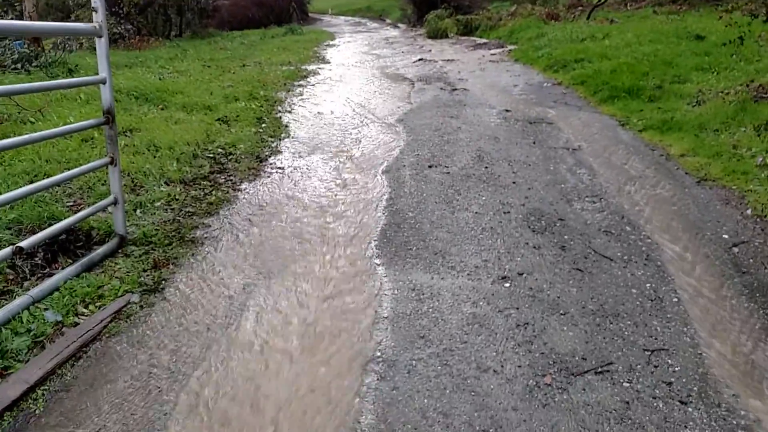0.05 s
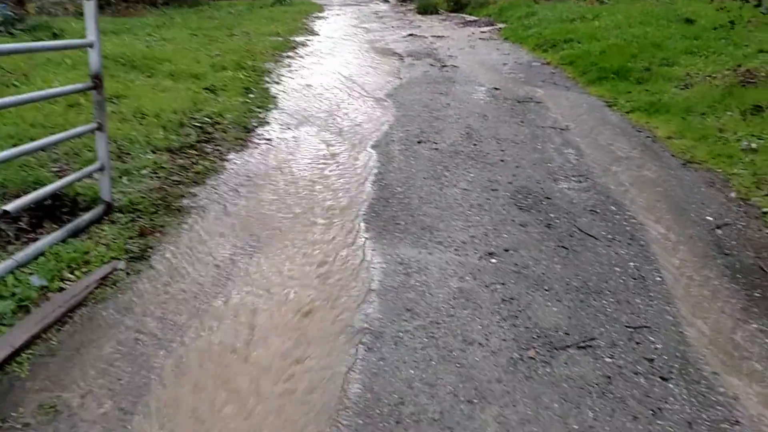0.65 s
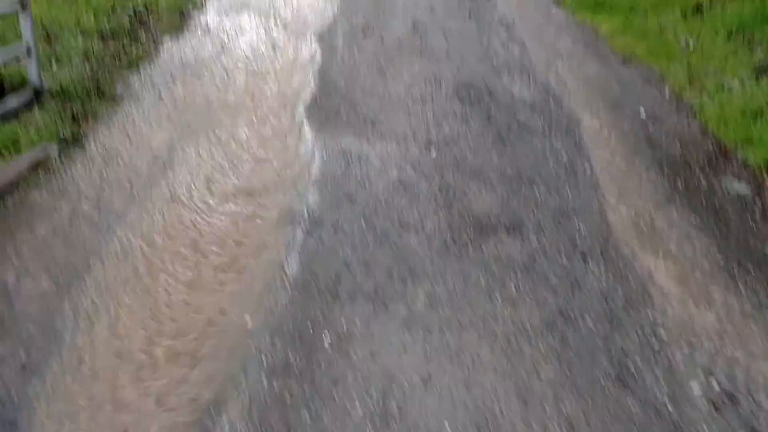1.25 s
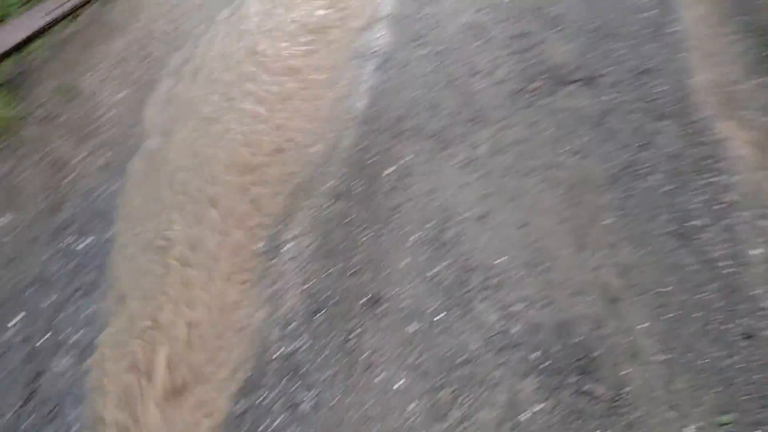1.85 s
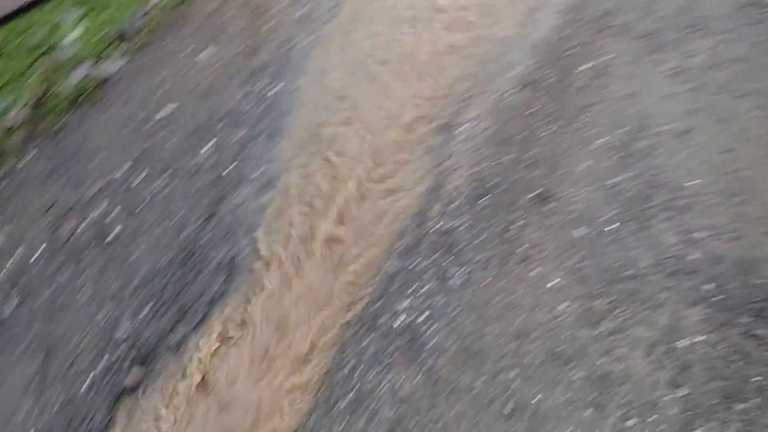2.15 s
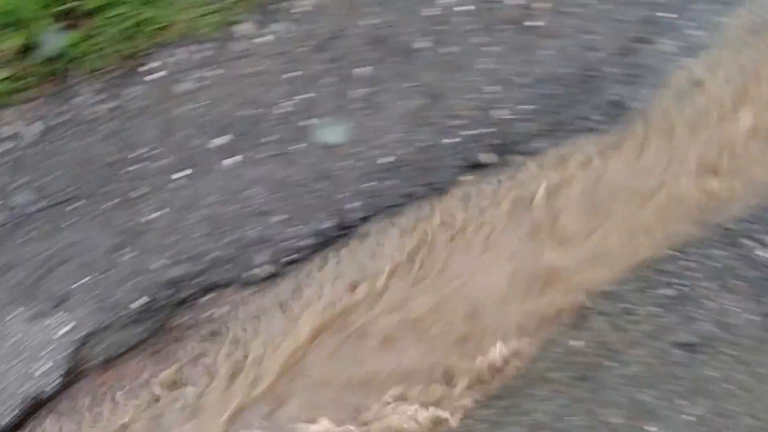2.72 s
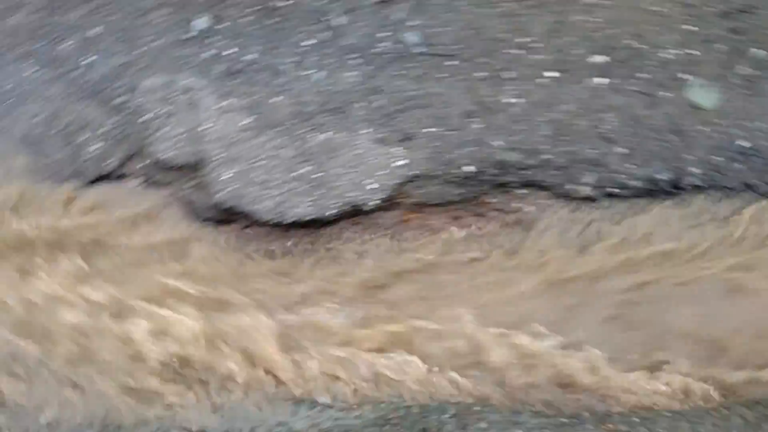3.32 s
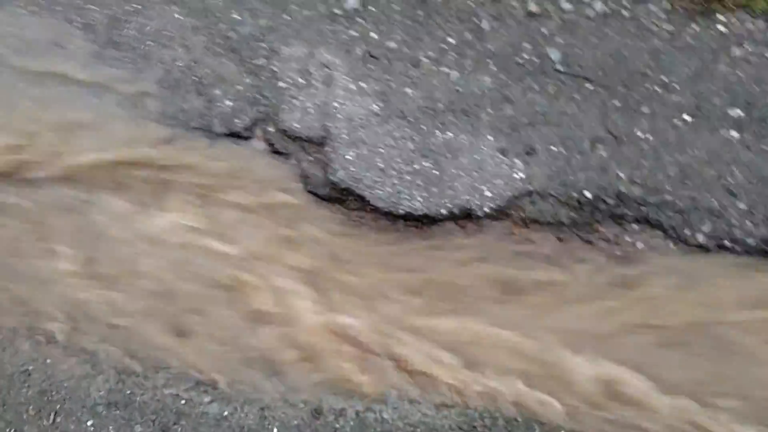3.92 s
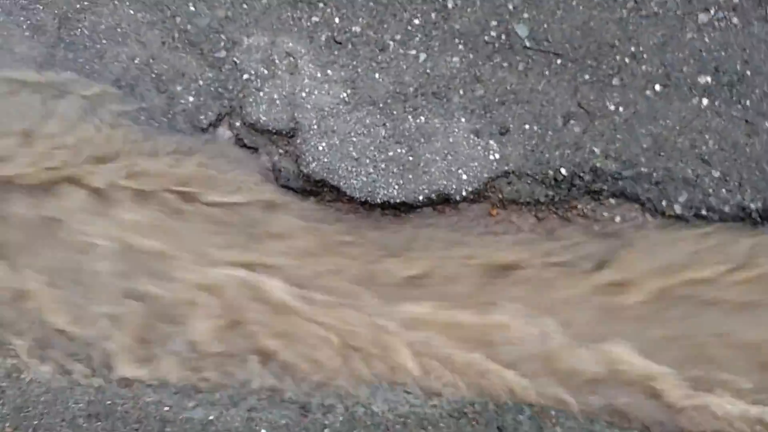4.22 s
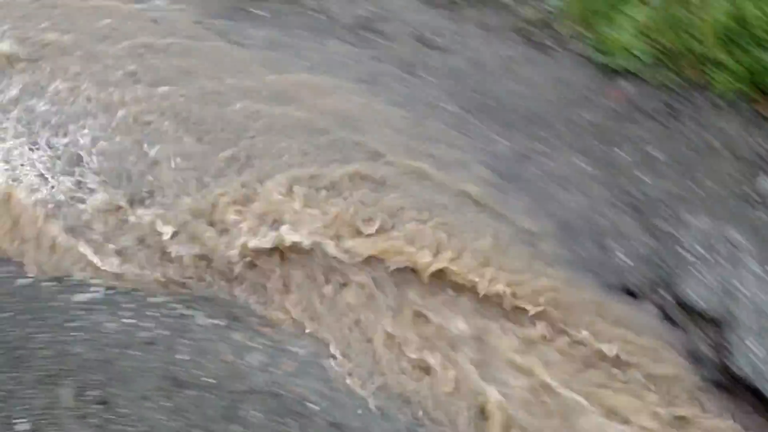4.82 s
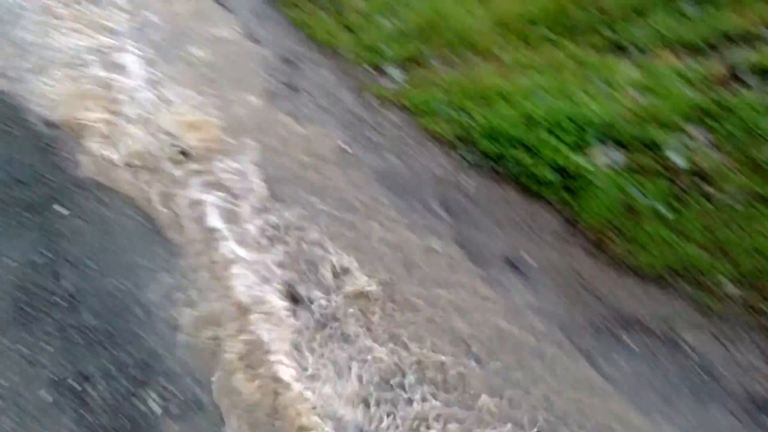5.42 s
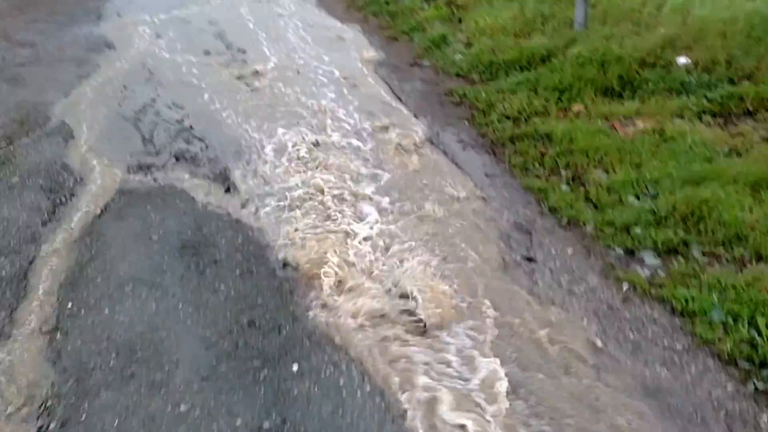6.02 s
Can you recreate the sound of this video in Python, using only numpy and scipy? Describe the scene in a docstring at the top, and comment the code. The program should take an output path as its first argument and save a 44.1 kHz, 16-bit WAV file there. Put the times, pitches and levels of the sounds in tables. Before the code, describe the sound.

Outdoors, muddy runoff rushes down a paved driveway in a churning wash of short bubbles and ticking spray. Light wind flutters on the hand-held microphone at first, then dies away. The microphone takes one dull knock as it moves closer, and the water grows louder and fuller. Near the end, hard wind buffets rumble in and briefly push the water down in level.

```python
"""A churning wash of short bubbles and ticking spray: muddy runoff rushing down a paved driveway.
It grows louder and fuller as a hand-held camera walks up to it; the camera takes one dull knock.
Wind eddies flutter on the microphone at first, die away, and return near the end as hard buffets
that make the gain control duck the water."""
import sys
import numpy as np
from scipy import signal
from scipy.fft import rfft, irfft
from scipy.io import wavfile
from scipy.ndimage import uniform_filter1d

SR = 44100
rng = np.random.default_rng(int(sys.argv[2]) if len(sys.argv) > 2 else 0)


def dump(signal):
    """Clip the signal to [-1, 1] and save it as 16-bit WAV at the path in sys.argv[1]."""
    limited = np.clip(np.atleast_2d(signal).T, -1, 1)
    pcm = np.round(limited * 32767).astype(np.int16)
    wavfile.write(sys.argv[1], SR, pcm)


N = 271782
TIME_S = np.arange(N) / SR

# Wind on the microphone. Each row: start in seconds, length in seconds, relative level in dB.
WIND_GUSTS = [(0, 0.95, -47), (0.153, .11, -31), (0.311, 0.028, -36), (0.406, 0.038, -32.5),
              (0.546, 0.13, -27.5), (0.675, 0.14, -34), (0.89, 0.056, -34), (1.37, 0.22, -38.5),
              (1.712, 0.24, -38), (2, 0.089, -37.5), (4.811, 0.028, -22.5), (4.907, 0.17, -20.5),
              (5.039, 0.28, -16.5), (5.36, 0.024, -14), (5.442, 0.093, -17), (5.558, 0.17, -10),
              (5.753, 0.29, -23.5), (5.864, 0.11, -8.5), (5.993, 0.21, -19.5)]
# Strongest eddies. Each row: centre in seconds, relative level in dB, frequency in Hz.
HARD_EDDIES = [(0.19, -23, 116), (0.244, -24, 139), (0.57, -15.5, 83), (0.614, -15.5, 161),
               (0.646, -17, 106), (1.393, -21, 108), (2.115, -22, 117), (4.823, -10, 158),
               (5.047, 7.5, 176), (5.069, -7, 210), (5.197, -0.5, 133), (5.246, -1, 148), (5.467, 4, 137),
               (5.582, -0.5, 197), (5.631, 7.5, 185), (5.705, 3, 154), (5.721, 2.5, 202), (5.745, 6, 132),
               (5.913, 9, 293), (5.981, 1, 190), (6.123, 4, 159)]
# Largest bubbles. Each row: time in seconds, peak in dB, pitch in Hz, decay in cycles.
BIG_BUBBLES = [(0.255, -27, 1800, 4.4), (0.483, -24, 1850, 2.2), (1.148, -19.5, 1940, 4.9),
               (1.561, -27.5, 970, 5.3), (1.829, -25, 1160, 7.8), (2.479, -17.5, 1190, 1.9),
               (2.899, -21.5, 1056, 7.3), (3.222, -24, 724, 8), (3.396, -21, 1230, 5.1),
               (3.447, -22.5, 990, 3), (3.462, -14, 704, 0.78), (3.569, -20, 1340, 4),
               (3.812, -24, 985, 6.5), (4.022, -19.5, 980, 6), (4.32, -25.5, 838, 10.6),
               (4.435, -25.5, 770, 8), (4.562, -24.5, 514, 7.9), (4.651, -20, 720, 3.7),
               (4.964, -22.5, 870, 7)]
# Brightest splashes. Each row: start in seconds, relative ring level in dB, pitch in Hz, tick in dB.
BRIGHT_SPLASHES = [(0.137, -32, 4430, -55), (0.493, -48, 5000, -45), (1.189, -36, 6120, -52),
                   (1.629, -31.5, 5420, -46), (2.033, -29, 4070, -56), (2.356, -33, 6000, -43),
                   (2.399, -29, 5600, -45), (2.643, -26, 5200, -41), (2.992, -27, 6240, -33),
                   (3.093, -31, 5690, -41), (3.81, -22.5, 3600, -52)]
# Spectra of the shallow sheet and deep channel. Each row: frequency in Hz, relative density in dB.
SHALLOW_SPECTRUM = [(40, 12.5), (150, 6), (450, -1), (850, 2.5), (1400, 1.5), (2000, -1.5), (2900, -13.5),
                    (4500, -21.5), (6500, -28), (8700, -30.5), (10500, -38.5), (13000, -39.5), (15500, -46)]
DEEP_SPECTRUM = [(40, -10), (170, -11), (400, -2.5), (750, 2), (1150, 2.5), (1800, -1), (2550, -9.5),
                 (3800, -18), (5800, -25), (7600, -33), (10500, -43), (13000, -42), (15500, -46)]
# Treble notch, sliding as the camera turns. Each row: time in seconds, centre in Hz, depth in dB.
TREBLE_NOTCH = [(0, 10400, -1), (1.1, 10200, 2), (1.6, 9100, 5), (2.3, 8500, 7), (2.8, 7700, 0),
                (3.6, 7300, 5), (5, 7750, 3.5), (6.1, 10400, 1)]
# Breaking wavelets. Each row: centre in seconds, half length in seconds, extra spray in dB.
WAVELETS = [(0.125, 0.039, 2.5), (1.99, .05, 2), (2.417, 0.03, 3), (2.967, 0.08, 1.5), (3.777, 0.35, 2.5),
            (4.353, 0.25, 2), (5.5, 0.12, 0.5)]
# Water under the camera. Each row: time in seconds, nearness 0-1 (level), depth 0-1 (colour).
WALK = [(0, 0.1, 0.15), (1.0, 0, 0), (1.7, 0.12, 0.3), (2.28, 0.28, 0.3), (2.5, 0.57, 0.64),
        (2.85, 0.58, 0.6), (3.3, 0.9, 0.93), (4.2, 0.8, 0.74), (4.6, 0.96, 0.87), (4.95, 1, 0.65),
        (5.35, 0.88, 0.56), (5.6, 0.91, 0.4), (6.15, 0.68, 0.5)]


def gain_of(db):
    """Decibels to amplitude."""
    return 10 ** (np.asarray(db) / 20)


def unit_rms(x):
    """Scale to an rms of one."""
    return x / np.sqrt(np.mean(x ** 2) + 1e-20)


def spectrum_db(points, hz):
    """Interpolate a spectrum over log frequency."""
    point_hz, db = np.transpose(points)
    return np.interp(np.log(hz + 1), np.log(point_hz), db)


def follow(rows, t):
    """Interpolate each column of a curve at times t."""
    times_s, *columns = np.transpose(rows)
    return [np.interp(t, times_s, column) for column in columns]


def add(mix, start_s, sound):
    """Mix a sound in at start_s."""
    part = mix[max(round(start_s * SR), 0):][:len(sound)]
    part += sound[:len(part)]


def band(x, lo_hz, hi_hz, order=2):
    """Zero-phase band-pass at unit rms."""
    sos = signal.butter(order, [lo_hz, hi_hz], "band", fs=SR, output="sos")
    return unit_rms(signal.sosfiltfilt(sos, x, padtype=None))


def patches(shape, frames, bins):
    """Random field, smooth over time and frequency."""
    field = rng.standard_normal(shape)
    for axis, size in enumerate((frames, bins)):
        field = signal.fftconvolve(field, np.expand_dims(np.hanning(size), 1 - axis), "same")
    return unit_rms(field)


def knock(start_s=2.3293, from_hz=750, to_hz=170, glide_s=0.0012, attack_s=0.0008, decay_s=0.0019):
    """Dull bump on the camera; its pitch drops at once."""
    out, t = np.zeros(N), np.arange(SR // 20) / SR
    hz = to_hz + (from_hz - to_hz) * np.exp(-t / glide_s)
    envelope = (1 - np.exp(-t / attack_s)) * np.exp(-t / decay_s)
    add(out, start_s, gain_of(-4) * envelope * np.sin(2 * np.pi * np.cumsum(hz) / SR))
    return out


def gust(start_s, length_s, db, attack_s=0.023, release_s=0.011):
    """Strength of one gust: rise, hold, release."""
    age_s = np.maximum(TIME_S - start_s, 0)
    release = np.exp(-np.maximum(age_s - length_s, 0) / release_s)
    return gain_of(db) * np.minimum(age_s / attack_s, 1) * release


def wind(soft_hz=(15, 150), hard_hz=(50, 275), order=3.96, lumps_db=3, calm_db=-27, full_db=-12):
    """Lumpy turbulence on the microphone; stronger wind has quicker eddies."""
    strength = sum(gust(*row) for row in WIND_GUSTS)
    hz, noise = np.fft.rfftfreq(N, 1 / SR), rfft(rng.standard_normal(N))
    soft, hard = (unit_rms(irfft(noise * hz / (hz + low) / np.sqrt(1 + (hz / top) ** (2 * order)), N))
                  for low, top in (soft_hz, hard_hz))
    force = np.clip((20 * np.log10(strength + 1e-9) - calm_db) / (full_db - calm_db), 0, 1)
    lumps = gain_of(lumps_db * band(rng.standard_normal(N), 24.6, 38.7))
    flow = ((1 - force) * soft + force * hard) * lumps
    flow /= np.sqrt(uniform_filter1d(flow ** 2, size=2600) + 1e-6)  # gusts alone set the slow level
    return gain_of(0.5) * strength * flow


def eddy(hz, width_cycles=0.31):
    """One swirl passing the microphone: a pressure push and pull, centred in 0.1 s."""
    cycles = hz * (np.arange(SR // 10) - SR // 20) / SR
    return np.cos(2 * np.pi * cycles + rng.uniform(0, 2 * np.pi)) / np.cosh(cycles / width_cycles)


def buffets(bite_ratio=2.38):
    """Hard eddies shed a quicker swirl; it gives the strong ones their bite."""
    out = np.zeros(N)
    for centre_s, db, hz in HARD_EDDIES:
        swirl = eddy(hz)
        bite = gain_of(db / 2 - 15) * eddy(hz * bite_ratio)
        add(out, centre_s - 0.05, gain_of(db - 0.5) * (swirl + bite))
    return out


def bubble(hz, cycles, rise):
    """An air pocket rings, its pitch rising as it nears the surface."""
    age = np.arange(0, 7, hz / cycles / SR)  # in decay times
    envelope = (1 - np.exp(-age * 4)) * np.exp(-age)
    return envelope / envelope.max() * np.sin(2 * np.pi * cycles * (age + rise * age ** 2 / 2))


def splash(ring_db, hz, tick_db, tick_s=0.0011, scatter_s=0.004):
    """A flung drop ticks, rings briefly and scatters into droplets."""
    t = np.arange(SR // 20) / SR
    tick = band(rng.standard_normal(len(t)), 3000, 14000, order=1) * np.exp(-t / tick_s)
    scatter = band(rng.standard_normal(len(t)) ** 3, 2400, 6400) * np.exp(-t / scatter_s)
    out = gain_of(tick_db) * tick + gain_of(ring_db - 13) * scatter
    add(out, 0, gain_of(ring_db) * bubble(hz, cycles=4, rise=0.035))
    return out


def splashes(far_db=-44.5, near_db=-43, spread_db=7, small_count=170):
    """Bright splashes over a spatter of small ones, slightly louder close by."""
    out = np.zeros(N)
    for start_s, ring_db, hz, tick_db in BRIGHT_SPLASHES:
        add(out, start_s, splash(ring_db - 2, hz, tick_db))
    for when, size, octaves in rng.random((small_count, 3)):
        start_s = when * N / SR
        near, _ = follow(WALK, start_s)
        ring_db = far_db + (near_db - far_db) * near + spread_db * size ** 2
        add(out, start_s, splash(ring_db, 3300 * 2 ** octaves, tick_db=ring_db - 9))
    return out


def plops():
    """Single large bubbles; the biggest glide most."""
    out = np.zeros(N)
    for time_s, db, hz, cycles in BIG_BUBBLES:
        add(out, time_s - 1 / hz, gain_of(db) * bubble(hz, cycles, rise=59 / hz))
    return out


def swarm(lo_hz, hi_hz, per_s, cycles, rise, spread_db, sizes=60):
    """Bubbles of many sizes born at random, with equal power per Hz across the band."""
    out = np.zeros(N)
    for hz in np.geomspace(lo_hz, hi_hz, sizes):
        births = rng.random(N) < per_s / sizes / SR
        gains = gain_of(spread_db * np.minimum(rng.standard_exponential(N), 4))
        decay_scale, rise_scale = rng.uniform(0.5, 1.5, 2)
        ring = bubble(hz, cycles * decay_scale, rise * rise_scale)
        out += np.sqrt(hz) * unit_rms(signal.oaconvolve(births * gains, ring)[:N])
    return unit_rms(out) * np.sqrt((hi_hz - lo_hz) / (SR / 2))


def churn():
    """Uncoloured running water: an even wash plus bubbles from glugs to ticks."""
    wash = rng.standard_normal(N)
    glugs = swarm(321, 1602, per_s=80, cycles=11, rise=0.1154, spread_db=2.5, sizes=40)
    gurgle = swarm(270.6, 2655, per_s=1100, cycles=3.05, rise=0.07, spread_db=2.5)
    drips = swarm(1498.5, 10130, per_s=300, cycles=17.4, rise=0.0805, spread_db=3.5)
    spray = swarm(2880, 11500, per_s=800, cycles=2.2, rise=0.015, spread_db=1.5)
    ticks = swarm(4800, 15500, per_s=120, cycles=2.6, rise=0.022, spread_db=1.5, sizes=20)
    layers = [(wash, -4), (glugs, -12.5), (gurgle, -6), (drips, -11), (spray, -6), (ticks, -10)]
    return sum(gain_of(db) * layer for layer, db in layers)


def stream(far_db=-37, near_db=-27.5, spray_far_db=-14, spray_near_db=-11.5, spray_from_hz=2700):
    """Churning water sloshes in patches, louder close by and fuller where it runs deep."""
    spectra = signal.stft(churn(), nperseg=512, noverlap=384)[2].T
    t = np.linspace(0, N / SR, len(spectra))[:, None]
    hz = np.linspace(1, SR / 2, spectra.shape[1])
    near, depth = follow(WALK, t)
    treble = 1 / (1 + (spray_from_hz / hz) ** 8)
    # Wavelets throw clumps of spray; close by, the clumps merge.
    patch_db = 1.57 * patches(spectra.shape, frames=15, bins=11) * (1 - 0.5 * treble)
    clump_db = 3 * patches(spectra.shape, frames=11, bins=130) * treble * (0.6443 - 0.47 * near)
    spectra = spectra * gain_of(patch_db + clump_db)

    notch_hz, notch_db = follow(TREBLE_NOTCH, t)
    notch = np.exp(-0.5 * (np.log2(hz / notch_hz) / 0.088) ** 2)
    water_db = (1 - depth) * spectrum_db(SHALLOW_SPECTRUM, hz) + depth * spectrum_db(DEEP_SPECTRUM, hz)
    colour = gain_of(water_db - notch_db * notch)
    body, top = (np.sqrt((colour[:, (hz > lo) & (hz < hi)] ** 2).sum(1, keepdims=True) / len(hz))
                 for lo, hi in [(650, 2500), (3000, 12000)])
    # The rush sets the body's level; the spray sets the top relative to it.
    rush_db = (1 - near) * far_db + near * near_db
    wavelet_db = sum(db * np.exp(-((t - centre_s) / half_s) ** 2) for centre_s, half_s, db in WAVELETS)
    spray_db = (1 - near) * spray_far_db + near * spray_near_db + wavelet_db
    spectra = spectra * gain_of(rush_db) * colour / body * (gain_of(spray_db) * body / top) ** treble
    return signal.istft(spectra.T, nperseg=512, noverlap=384)[1][:N]


def scene():
    """Water, wind and knock at one microphone."""
    return (stream() + plops() + splashes() + wind() + buffets() + knock())[None]


def record(dry, ceiling_db=1.14, recovery_db_per_s=9.5, cutoff_hz=15650):
    """Gain control ducks at once on hard buffets and recovers slowly; then soft clip and low-pass."""
    level_db = 20 * np.log10(abs(signal.hilbert(dry[0])) + 1e-9)
    over_db = np.maximum(level_db - ceiling_db, 0)
    recovery_db = recovery_db_per_s * TIME_S
    duck_db = np.maximum.accumulate(over_db + recovery_db) - recovery_db
    ducked = dry * gain_of(-uniform_filter1d(duck_db, size=150))
    clipped = ducked / (1 + ducked ** 8) ** (1 / 8)
    lowpass = signal.firwin(511, cutoff_hz, window=("kaiser", 9), fs=SR)
    return signal.oaconvolve(clipped, lowpass[None], "same")


dry = scene()
out = record(dry)
dump(out)
```